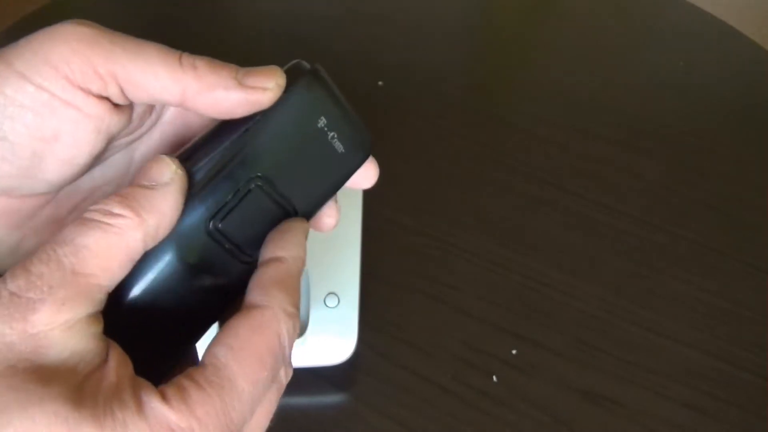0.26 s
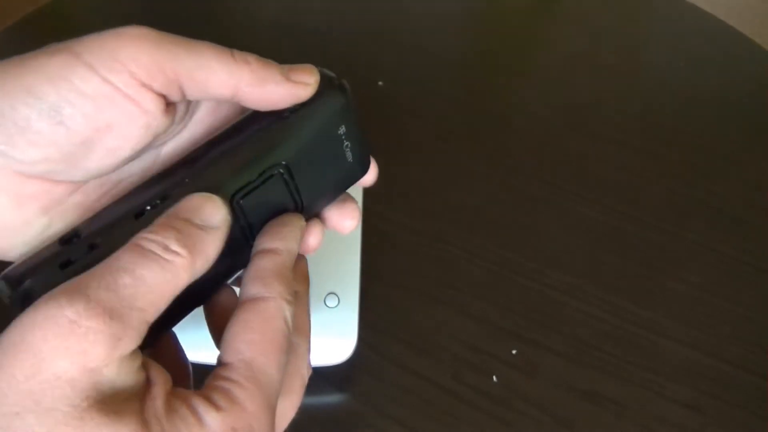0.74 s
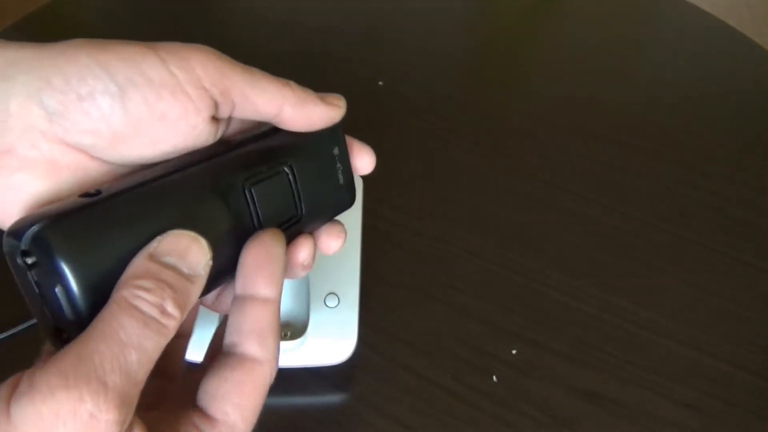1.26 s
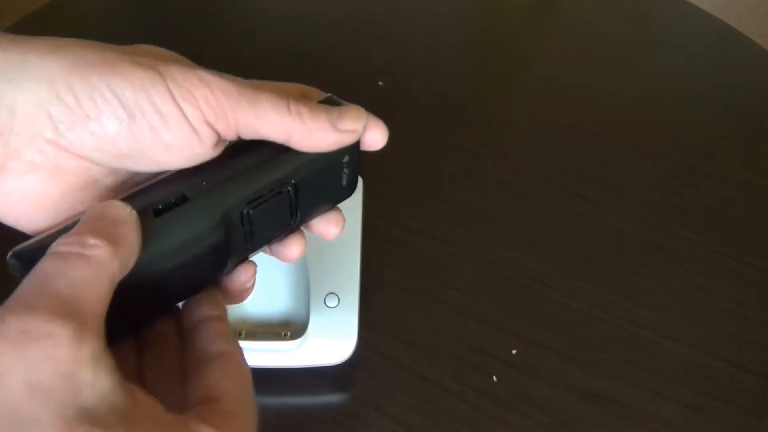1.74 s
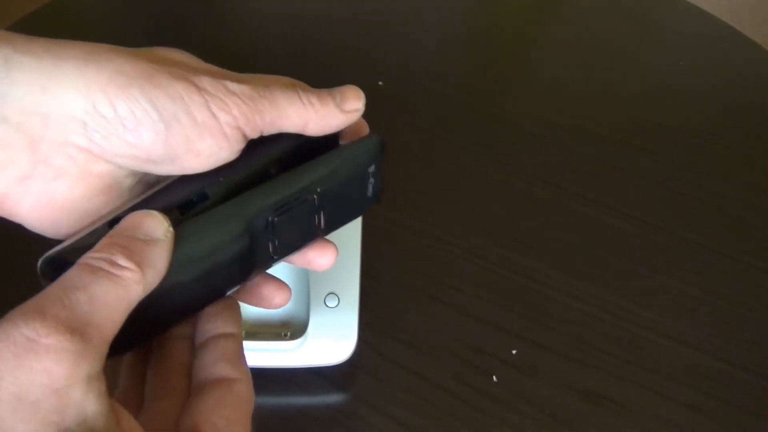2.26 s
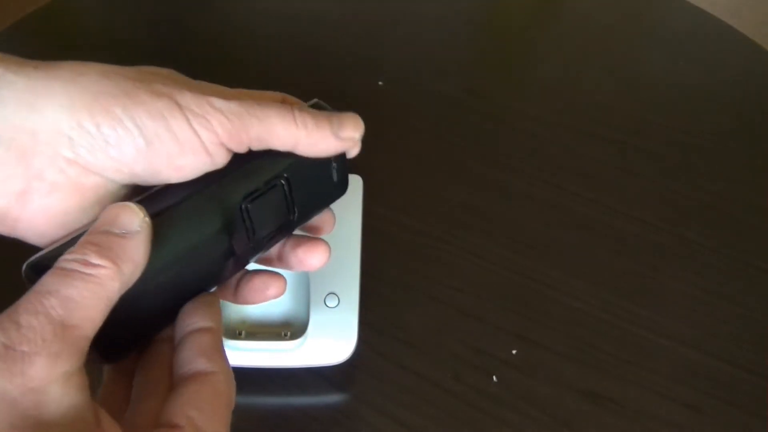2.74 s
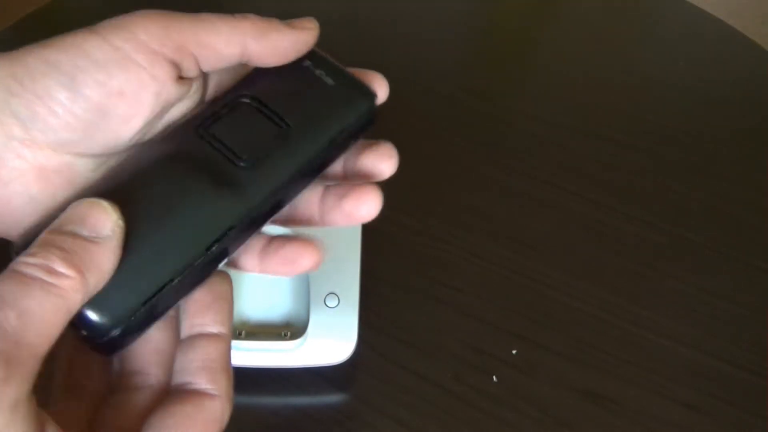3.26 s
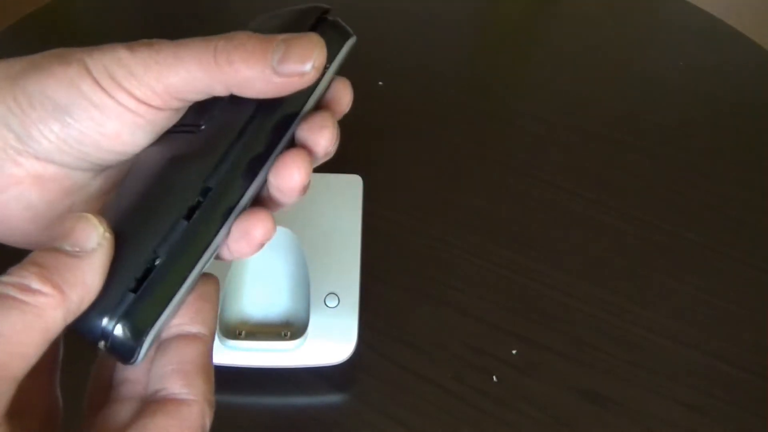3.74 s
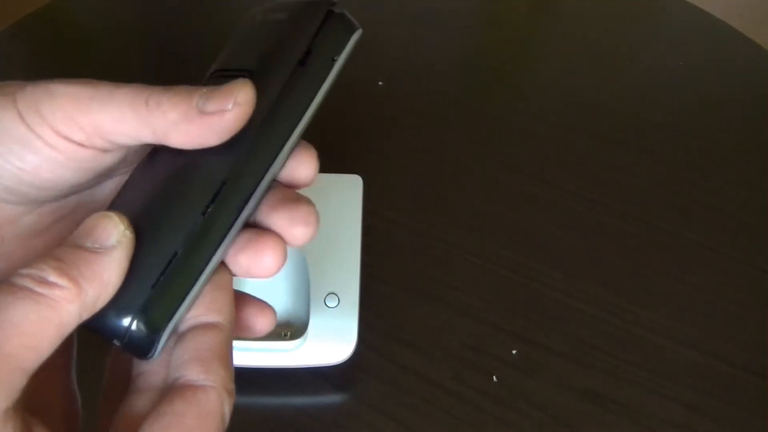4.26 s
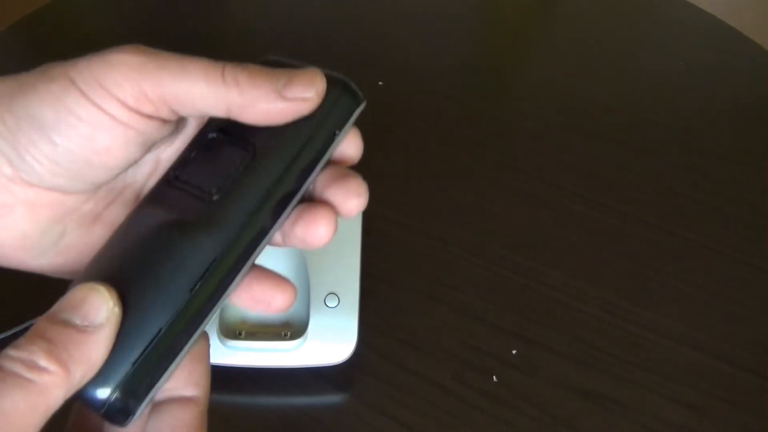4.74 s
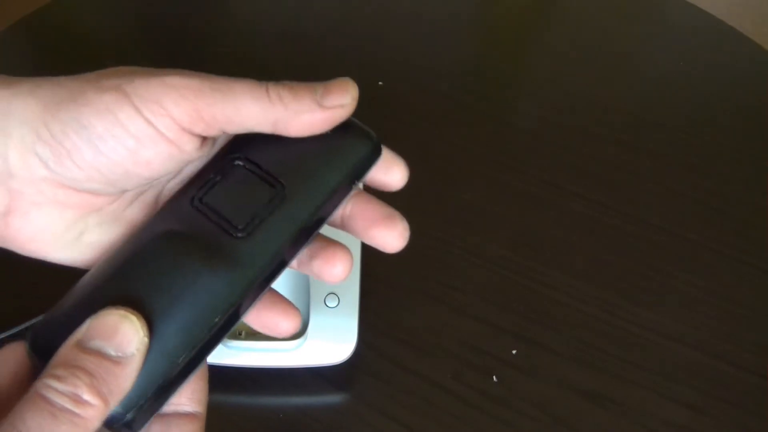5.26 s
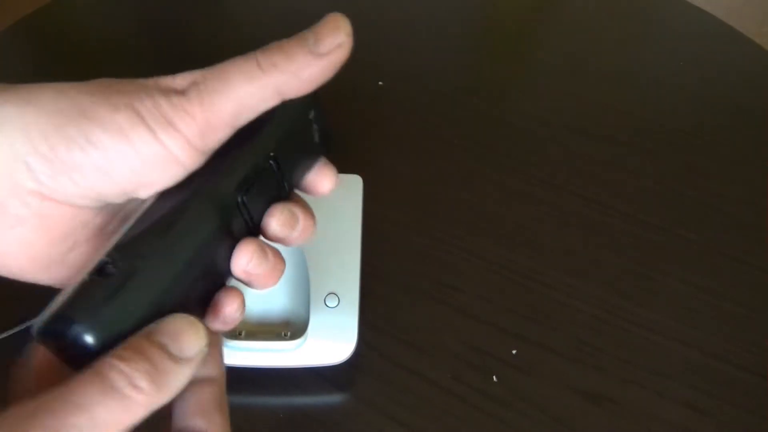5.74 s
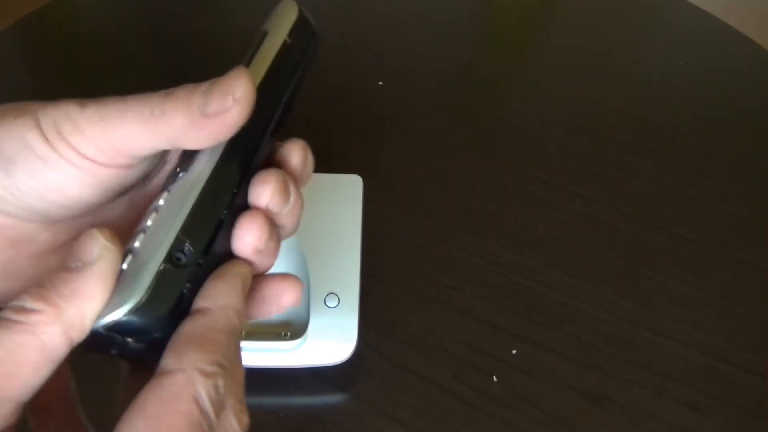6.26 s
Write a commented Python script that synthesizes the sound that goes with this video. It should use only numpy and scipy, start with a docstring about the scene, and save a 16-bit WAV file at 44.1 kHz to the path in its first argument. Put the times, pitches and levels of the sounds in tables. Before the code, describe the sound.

Close, dry plastic handling in a small room, over a low soft fan hush and a barely audible high electronic whine. Skin rubs the casing, then small bright ticks come at 0.26-0.5 s. At 0.6 s a loud cluster of crackling snaps frees the battery cover, with a brief buzz near 3.8 kHz and a slight metallic ping. Until about 1.7 s there are light scrapes; from there to 3.4 s come short slides, notably at 2.2 s, dull palm drag, faint loose ticks and clearer clicks at 2.75 and 2.87 s. A firm knock lands at 3.88 s, small clicks follow, then a hard snap at 4.9 s and a louder, hollow one at 5.2 s, each with a short room tail. Soft rubbing and turning follow, with a small pinging tick at 5.96 s, until the sharpest snap at 6.44 s, right at the end.

```python
"""Battery cover of a cordless handset

Two hands turn a cordless phone close by, slide its battery cover off and press it back on. Brief filtered-noise
forces ring the plastic shell as ticks and snaps; streams of random slips make the rubbing. Damped sines give
the pings and the buzz of the cover, steady sines the thin whines; dense decaying reflections make the small
room, with a faint fan in it. A limiter dips at the hardest snaps, so the room swells up behind them."""
import sys
import numpy as np
from scipy import signal
from scipy.fft import rfft, irfft
from scipy.io import wavfile
from scipy.ndimage import uniform_filter1d, minimum_filter1d

SR = 44100
rng = np.random.default_rng(int(sys.argv[2]) if len(sys.argv) > 2 else 0)


def wrap_up_sound(samples):
    """Save the sound to the file named by the first command line argument, as 16-bit audio."""
    columns = np.atleast_2d(samples).T
    # keep every value between -1 and 1, then stretch to whole-number steps
    tamed = np.clip(columns, -1, 1)
    steps = np.round(tamed * 32767).astype(np.int16)
    wavfile.write(sys.argv[1], SR, steps)


N = 286199
TIME, HZ = np.arange(N) / SR, np.fft.rfftfreq(N, 1 / SR)


def amp(db):
    """Level in decibels to amplitude ratio."""
    return 10 ** (np.asarray(db) / 20)


def evened(x):
    """Normalization to an rms of 1."""
    return x / np.sqrt(np.mean(x ** 2) + 1e-20)


def read(points, hz, axis=1):
    """Interpolation of one table column along a logarithmic frequency axis."""
    points = np.array(points)
    return np.interp(np.log(hz + 1), np.log(points[:, 0] + 1), points[:, axis])


def shaped(x, gain):
    """Linear filtering: a full-length spectrum is multiplied by a frequency response."""
    return irfft(rfft(x) * gain, N)


def noise(gain):
    """Gaussian noise of rms 1, coloured by a frequency response."""
    return evened(shaped(rng.standard_normal(N), gain))


def add(mix, s, sound):
    """Superposition: a sound is added to the mix from time s."""
    start = max(round(s * SR), 0)
    part = mix[start:][:len(sound)]
    part += sound[:len(part)]


def decay(t, t60):
    """Exponential decay of a damped mode: 60 dB in t60 seconds."""
    return np.exp(-np.log(1000) * t / t60)


def air():
    """Stationary broadband noise of the room air, with the narrow noise bands of a fan's hum and whine."""
    # spectral colour of the hush: f/Hz, level/dB
    hush_colour = [(20, -25), (40, -49), (57, -0.5), (80, -14.5), (130, -1), (205, 4.5), (300, -7),
                   (500, -11), (800, -12.5), (1400, -11.5), (2500, -11.5), (4800, -21), (7500, -18.5),
                   (15500, -27)]
    # fan tones: f/Hz, width/Hz, level/dB
    fan_tones = [(56.6, 5.3, -72.5), (203.4, 12, -66.5), (1150.5, 58, -64), (1430, 27, -70)]
    hush_db = -57
    sound = amp(hush_db) * noise(amp(read(hush_colour, HZ)))
    for f, width, db in fan_tones:
        resonance = 1 / (1 + ((HZ - f) / width * 2.1) ** 2)
        sound += amp(db) * noise(resonance)
    return sound


def whine():
    """Undamped sinusoids: the faint steady whine of nearby electronics."""
    # tones: f/Hz, rms level/dB
    tones = [(12000, -73.5), (13248, -79)]
    return sum(amp(db) * np.sqrt(2) * np.sin(2 * np.pi * hz * TIME) for hz, db in tones)


def friction(colour, slips_per_s=6000, spread_db=0.5, flutter_db=2.0, flutter_hz=30, patchy_db=3.0, size=512):
    """Stick-slip friction: countless tiny random slips, modulated by a fluttering grip, excite the shell."""
    slips = (rng.random(N) < slips_per_s / SR) * rng.standard_normal(N)
    slips *= amp(spread_db * np.minimum(rng.exponential(1, N), 6))
    grip = amp(flutter_db * noise(1 / (1 + (HZ / flutter_hz) ** 2)))
    spectrogram = signal.stft(slips * grip, nperseg=size)[2]
    # moving fingers damp and free patches of the shell's ring
    patches = rng.standard_normal(spectrogram.shape)
    patches = uniform_filter1d(patches, size=5, axis=0)
    patches = uniform_filter1d(patches, size=14, axis=1)
    spectrogram = spectrogram * amp(patchy_db * evened(patches))
    slips = signal.istft(spectrogram, nperseg=size)[1][:N]
    return evened(shaped(slips, amp(read(colour, HZ))))


def rubbing(grip_body_db=-3.0):
    """Sliding friction in three bands: skin hiss, hollow-body resonance and the dull drag of the palms."""
    # spectral colours of the three: f/Hz, level/dB
    hiss_colour = [(1500, -27.5), (4800, -15.5), (5900, 2), (8000, -1.5), (9500, -7.5), (12500, -8),
                   (16000, -18)]
    body_colour = [(120, -10), (350, -11.5), (800, -5.5), (1400, -4), (2100, 1), (2500, -2), (3000, 1.5),
                   (3900, 0.5), (4700, -11.5), (8000, -20)]
    drag_colour = [(100, -3), (260, 3.5), (490, 2.5), (650, -4), (900, -5), (2000, -29)]
    # light rub of the grip as the hands shift: t/s, hiss level/dB
    grip_course = [(0, -59), (1.4, -56), (2.1, -58), (2.3, -59.5), (2.62, -67), (2.9, -61.5), (3.5, -55.5),
                   (3.85, -66.5), (5.3, -61), (5.7, -58), (6.45, -58)]
    # muffled drag of the palms on the casing: t/s, level/dB
    palm_course = [(0, -60), (.35, -65.5), (.9, -67.5), (1.6, -72.5), (1.92, -55.5), (2.2, -59.5),
                   (2.65, -59), (3.2, -68.5), (3.7, -57.5), (4.1, -67.5), (5.6, -65), (6.45, -60)]
    # slides of a finger or the cover over the shell, swelling and fading evenly:
    # middle t/s, time from middle to 1/e of the amplitude/s, hiss level/dB, body level relative to hiss/dB
    strokes = [ (0.081, 0.028, -55.5, 2.5), (0.269, .014, -54, 13), (0.475, 0.063, -51.5, 3.5),
               (0.603, 0.034, -39, 1.5), (0.744, 0.012, -47, 5), (0.874, .03, -52.5, -6),
               (0.973, 0.045, -54.5, -2.5), (1.117, 0.016, -51.5, -2.5), (1.265, 0.035, -50.5, -2),
               (1.51, 0.043, -53, -10), (1.67, 0.064, -50, -1), (1.808, 0.0092, -54, 7.5),
               (1.944, 0.055, -52.5, 7.5), (2.07, 0.0098, -44, -3), (2.206, 0.012, -37.5, -5),
               (2.465, 0.011, -43, -1.5), (2.512, 0.026, -47, -3.5), (2.716, 0.021, -51, 3.5),
               (2.912, 0.07, -52, 3.5), (3.05, 0.056, -59.5, 6.5), (3.236, 0.11, -49.5, -2),
               (3.333, 0.028, -54.5, 3.5), (3.406, 0.029, -44, -5), (3.522, 0.018, -53.5, -0.5),
               (3.68, 0.069, -53, -3), (4.124, 0.036, -55.5, -6), (4.249, 0.012, -52, -5),
               (4.487, 0.017, -51, -2.5), (4.585, .017, -46, -3), (5.457, 0.037, -46, -11),
               (5.565, 0.028, -49.5, -2.5), (5.673, 0.019, -48.5, -2), (5.91, 0.073, -49, -6),
               (6.007, 0.045, -48.5, -3.5), (6.235, 0.089, -48.5, -8.5), (6.395, 0.024, -48, -3)]
    hiss = amp(np.interp(TIME, *np.transpose(grip_course)))
    body = amp(grip_body_db) * hiss
    for middle, half_length, db, depth_db in strokes:
        stroke = amp(db) * np.exp(-((TIME - middle) / half_length) ** 2)
        hiss = np.hypot(hiss, stroke)
        body = np.hypot(body, amp(depth_db) * stroke)
    palm = amp(np.interp(TIME, *np.transpose(palm_course)))
    return hiss * friction(hiss_colour) + body * friction(body_colour) + palm * friction(drag_colour)


def room(x, onset_s=0.00081, size=256):
    """Reverberation: dense reflections of random sign, each frequency band with its own decay time."""
    # response of the room: f/Hz, level/dB, t60/s
    response = [(98.5, -39, 0.3), (350, -15, 0.31), (614, -4, 0.36), (840, -15.5, 0.39), (1010, -13, 0.31),
                (1620, -19, 0.36), (3260, -16.5, 0.25), (6550, -15, 0.28), (9900, -13, 0.24),
                (16000, -18, 0.26)]
    age = np.arange(SR // 2) / SR
    taps = rng.choice([-1., 1.], SR // 2) * (1 - np.exp(-age / onset_s))
    hz, t, bands = signal.stft(taps, SR, nperseg=size)
    t60 = read(response, hz, axis=2)[:, None]
    bands *= amp(read(response, hz)[:, None]) * decay(t, t60)
    bands *= np.sqrt(2 * np.log(1000) / (t60 * SR))  # the level is independent of the decay time
    return signal.fftconvolve(x, signal.istft(bands, SR, nperseg=size)[1])[:N]


def turning_room(x, count=3):
    """Change of reflection paths as the handset turns: every 1/count s the next of count room responses."""
    path = np.floor(TIME * count) % count
    return sum(room(x * (path == k)) for k in range(count))


def ringing(db):
    """Minimum-phase (causal) impulse response of a body, from its magnitude by the Hilbert transform."""
    log_gain = np.log(amp(np.r_[db, db[-2:0:-1]]))
    return np.fft.ifft(np.exp(np.conj(signal.hilbert(log_gain)))).real


def click(ring_hz, ring_db, bright_db, length, evenness, ring_octaves=0.36, rise_s=0.0004, size=2048):
    """Impact excitation: a brief chattering force, a quarter of the way in, rings the shell's modes."""
    # radiation of the hollow handset: f/Hz, level/dB
    shell = [(30, -39), (120, -13), (300, -7.5), (700, -10), (1000, -3.5), (1450, 3.5), (2600, -1.5),
             (3900, 2), (4800, -7), (6300, 3.5), (8300, -6), (12000, -10), (16000, -22)]
    # its narrow modes: f/Hz, width/Hz, height/dB
    modes = [(513, 42, 2.5), (855.6, 11.6, 8), (1430, 29, 3.5), (1680, 66, 2.5), (2028, 230, 4.5),
             (2780, 195, 4.5), (3884, 51, 0), (4300, 88, 3), (6760, 170, -5), (7820, 280, 5)]
    hz = np.fft.rfftfreq(size, 1 / SR) + 1
    t = (np.arange(size) - size // 4) / SR
    colour = read(shell, hz)
    colour += sum(db / (1 + (2 * (hz - f) / width) ** 2) for f, width, db in modes)
    colour += ring_db * np.exp(-.5 * (np.log2(hz / ring_hz) / ring_octaves) ** 2)  # the spot that is struck
    colour += bright_db * np.log2(np.maximum(hz, 800) / 3000)  # hard edges are brighter
    envelope = np.exp(-abs(t) / np.where(t < 0, rise_s, length))
    force = rfft(np.sqrt(envelope) * rng.standard_normal(size))
    force = irfft(force / (abs(force) + 1e-9))  # sharp contacts push on all pitches alike
    force = rfft(np.sqrt(envelope) * force)
    force = irfft(force / (abs(force) + 1e-9) ** evenness)  # evenness 1 flattens the spectrum
    sound = signal.fftconvolve(force, ringing(colour))[:size]
    return sound / np.linalg.norm(sound)


def clicks(evenness, lead=512):
    """Impacts of plastic on plastic, heard from one side (evenness 0) or summed over all sides (1)."""
    # contacts, from the latch and the cover's release to its last catch shutting:
    # t/s, energy level/dB, ring f/Hz, ring height/dB, brightness/(dB per octave), chatter length/s
    contacts = [ (.26, -3, 6200, 14, -4, 0.0042), (0.271, -0.5, 6000, 10, -3.5, 0.0065),
                (0.282, -5.5, 6200, 9, -3, 0.0024), (.4416, -9, 2870, 28, 4, 0.00096),
                (.461, -7.5, 6200, 10, -2.8, 0.0027), (0.493, -13.5, 6000, 11, -6, .002),
                (0.542, -18.5, 3060, 13, -1, 0.0017), (0.5978, 14.5, 3760, 8.5, 0.5, 0.0028),
                (0.604, 12, 4150, 4, 0, 0.003), (0.6064, 12.5, 4030, 0, .5, 0.0032),
                (0.6142, 7, 3460, 6, .5, 0.0034), (0.6177, 7, 1630, 13, 0.5, .0037),
                (0.6278, 3.5, 3100, 9, -2, .0047), (.6364, 3, 1250, 11.5, 1.3, .003),
                (0.7456, -3, 7350, 5, 0, 0.0037), (0.8498, -5, 1220, 4, .5, 0.0035),
                (1.7825, -22, 2320, -3, -8, 0.0014), (1.8625, -17, 4310, 5, -1.5, 0.0075),
                (2.4345, -13.5, 1960, 11, 2.5, 0.0024), (2.5, -19, 496, 20.5, -0.5, 0.0023),
                (2.7457, 5, 1580, 5, 1, 0.0025), (2.7482, -3.5, 1430, 5, -4.5, 0.0037),
                (2.8708, 1, 2140, 15, -3, 0.00081), (3.1213, -15.5, 2970, 9, 0.5, 0.0064),
                (3.325, -14, 700, 11, 9, .0015), (3.602, -7.5, 2360, 7.5, 0, 0.0027),
                (3.6283, -11, 8000, 8.5, -3, 0.0035), (3.8737, 5, 780, 0, -1, 0.0027),
                (3.8769, 14, 930, 11, 0, 0.0013), (3.898, -6, 1810, 9, -1, 0.0046),
                (4.136, -19.5, 1510, 0.5, -5.5, 0.0084), (4.28, -22.5, 1720, 3, -6.5, 0.0051),
                (4.3948, -15.5, 860, 9, 0, 0.0012), (4.432, -12, 2080, 7, -5, 0.005),
                (4.575, -11.5, 2500, 13.5, 12.5, 0.0047), (4.69, -5, 2850, 8.5, -.3, .004),
                (4.7303, -5, 1140, 8, 1, 0.0019), (4.837, 4.5, 995, 11, -3, 0.0018),
                (4.8962, 17.5, 1860, 13.5, 2, 0.0013), (4.8964, 12, 637, 16, -1, 0.0018),
                (5.1385, -17.5, 1600, 16, 4.5, 0.0049), (5.199, 6, 1380, 14.5, -3.5, 0.00051),
                (5.2042, 23.5, 796, 18.5, 1.5, 0.0015), (5.2047, 25, 1680, 22, -9, 0.00063),
                (5.6382, -8.5, 2080, 8, -5.5, 0.0027), (5.9621, -7, 8000, 2, -1.3, 0.0021),
                (5.9683, -11, 1390, 16, -4, 0.0022), (6.1444, -19.5, 2140, 0, -5, .0026),
                (6.3727, -19, 740, 17, -2, .007), (6.433, -4, 3100, 29, -17, 0.0025),
                (6.437, 2.5, 2980, 24.5, -17, 0.0035), (6.4415, 0, 2300, -1, -13, 0.0024),
                (6.4464, 35, 730, 8.5, 3.5, 0.00036)]
    out = np.zeros(N)
    for s, db, ring_hz, ring_db, bright_db, length in contacts:
        # the strike lies lead samples into the click
        add(out, s - lead / SR, amp(db) * click(ring_hz, ring_db, bright_db, length, evenness))
    return out


def pings():
    """Free vibration of a small metal part, perhaps a battery spring, in damped modes when jarred."""
    # excitations: t/s, level/dB
    jars = [(0.279, -46), (.607, -44), (2.748, -41.5), (4.837, -49), (5.964, -42.5)]
    # modes of the part: f/Hz, level/dB, t60/s
    spring_modes = [(1380, 0.5, 0.27), (2900, -22, 0.058)]
    out, t = np.zeros(N), np.arange(SR // 2) / SR
    ring = sum(amp(db) * decay(t, t60) * np.sin(2 * np.pi * hz * t) for hz, db, t60 in spring_modes)
    for s, db in jars:
        add(out, s, amp(db) * ring)
    return out


def catches(size=4000):
    """A single damped plate mode: the freed thin cover buzzes as each catch lets go."""
    # releases: t/s, initial level/dB, f/Hz, t60/s
    releases = [(0.596, -23, 3800, 0.014), (0.6053, -12, 3970, 0.031), (0.6078, -7.5, 3820, 0.057),
                (6.4355, -26, 2980, 0.075)]
    out, t = np.zeros(N), np.arange(size) / SR
    for s, db, hz, t60 in releases:
        add(out, s, amp(db) * decay(t, t60) * np.sin(2 * np.pi * hz * t))
    return out


def loose_cover():
    """Impacts as a Poisson process: the loose cover ticks faintly, each time on another spot of the shell."""
    from_s, to_s, ticks_per_s = 1.65, 3.4, 6
    tick_db, spread_db = -24, 0.5
    centre_hz = 2500  # the spots ring within half an octave of this
    ring_db, bright_db_per_octave, length_s = 9, -1, 0.003
    out = np.zeros(N)
    loose = (TIME > from_s) & (TIME < to_s)
    for s in TIME[loose & (rng.random(N) < ticks_per_s / SR)]:
        strength, spot = 2 * rng.random(2) - 1
        tick = click(centre_hz * 2 ** (spot / 2), ring_db, bright_db_per_octave, length_s, 0)
        add(out, s, amp(tick_db + spread_db * strength) * tick)
    return out


def jolts(size=2000):
    """Rigid-body recoil: a low push and rebound of the whole handset in the palm as a latch gives."""
    # pushes: t/s, level/dB, decay time/s
    pushes = [(3.903, -29, 0.00078), (4.897, -19.5, 0.00071), (5.201, -24, 0.00095), (6.441, -20, 0.0012),
              (6.446, -29, .003)]
    out = np.zeros(N)
    for s, db, decay_s in pushes:
        u = np.arange(size) / SR / decay_s
        add(out, s, amp(db) * np.e * u * (1 - u / 2) * np.exp(-u))
    return out


def scene(room_side_db=-16):
    """Mid-side stereophony: quadrature side signals widen the sound, and a level difference places it."""
    # stereo width of the clicks, and of the air and other hand sounds: f/Hz, side level relative to mid/dB
    click_side = [(100, -22), (300, -11), (700, -7), (1200, -11.5), (2400, -12.5), (4400, -20),
                  (6300, -23.5), (8300, -11), (10000, -8), (12000, -31)]
    air_side = [(50, -14), (200, -16), (500, -13), (1200, -11.5), (3000, -18.5), (6300, -24), (8300, -6.5),
                (12000, -19)]
    # two close microphone ports hear the handset unequally: f/Hz, left minus right level/dB
    balance = [(100, -1.5), (230, 0.5), (480, 3), (1000, 1.5), (2000, 1), (4000, 0), (7000, 0.3)]
    hands = rubbing() + loose_cover() + jolts() + pings() + catches()
    radiated = clicks(1) + hands
    # every call of clicks, air and room draws fresh noise
    mid = clicks(0) + hands + turning_room(radiated) + air() + whine()
    # the factor 1j turns the phase by 90 degrees
    side = shaped(clicks(0), 1j * amp(read(click_side, HZ)))
    side += shaped(air() + hands, 1j * amp(read(air_side, HZ)))
    side += amp(room_side_db) * room(radiated)
    lean = amp(read(balance, HZ) / 2)
    return np.array([shaped(mid + side, lean), shaped(mid - side, 1 / lean)])


def record(dry, ceiling=0.55, release_s=0.026, clip_level=0.83, size=101, order=9, edge_hz=16000):
    """Dynamic compression: a look-ahead limiter on each channel, then soft saturation and a low-pass."""
    crest = np.sqrt(abs(uniform_filter1d(dry ** 2, order)))  # short-time rms
    cut = np.maximum(1 - ceiling / (crest + 1e-9), 1e-9)
    # each cut decays exponentially until a deeper one takes over
    held = np.maximum.accumulate(np.log(cut) + TIME / release_s, axis=1)
    held = np.exp(held - TIME / release_s)
    # the gain falls ahead of the snap and is smoothed over size samples
    gain = uniform_filter1d(minimum_filter1d(1 - held, size), size)
    rounded = clip_level * np.tanh(dry * gain / clip_level)
    low_pass = signal.firwin(301, edge_hz, window=("kaiser", 9), fs=SR)
    return signal.oaconvolve(rounded, low_pass[None], "same", axes=1)


dry = scene()
out = record(dry)
wrap_up_sound(out)
```